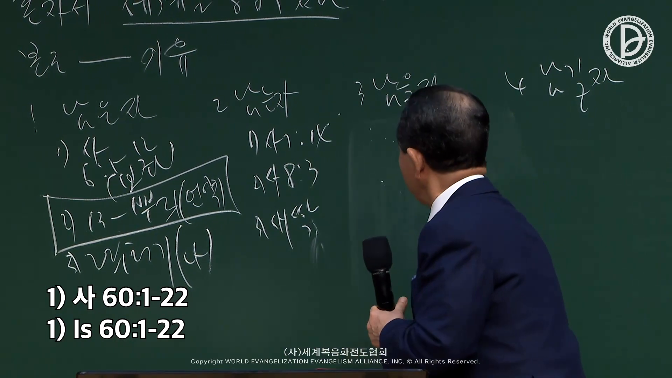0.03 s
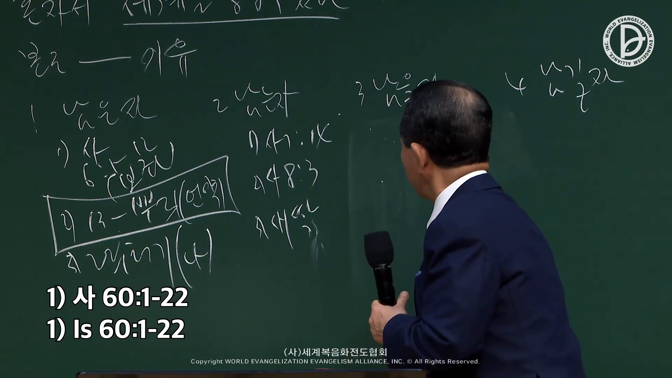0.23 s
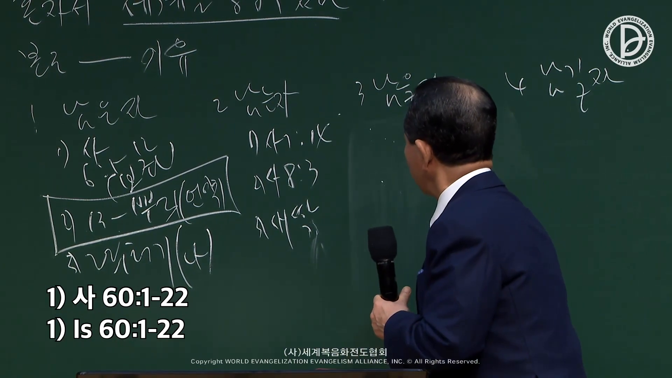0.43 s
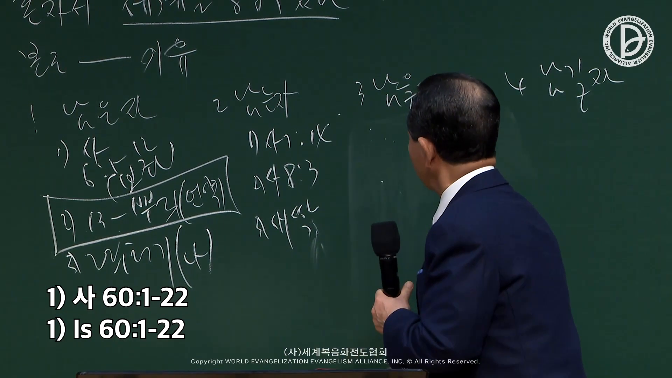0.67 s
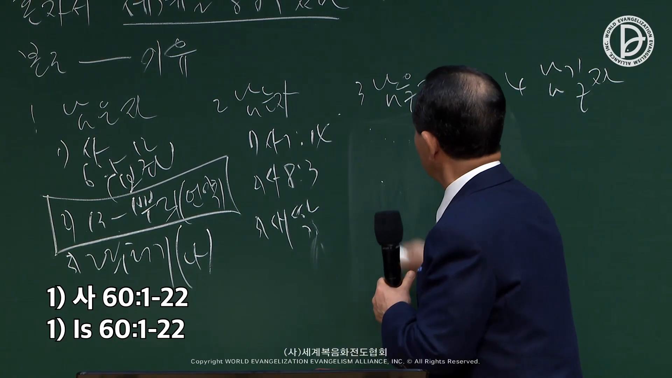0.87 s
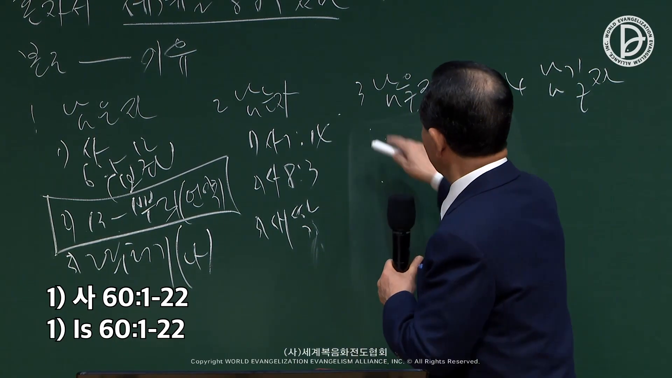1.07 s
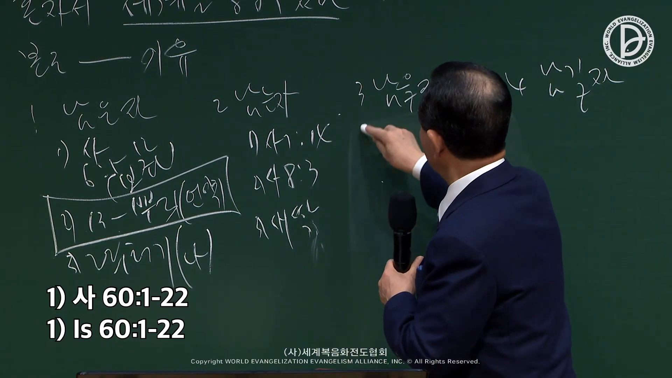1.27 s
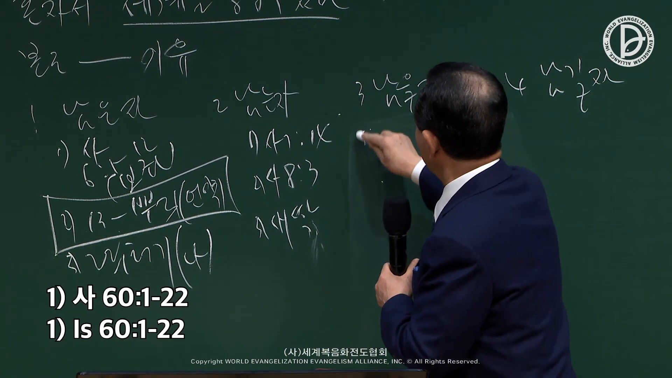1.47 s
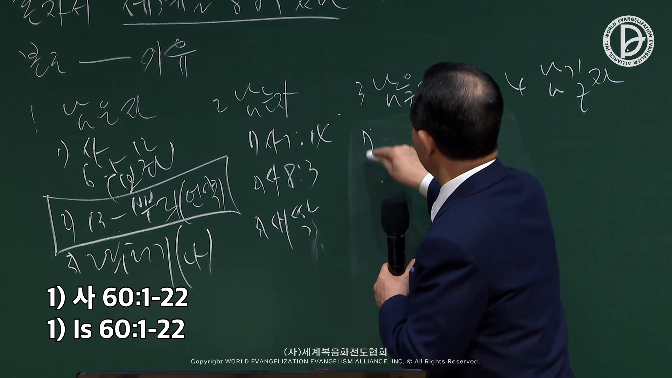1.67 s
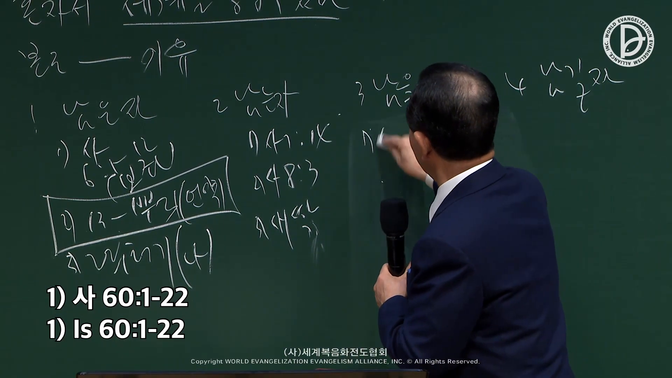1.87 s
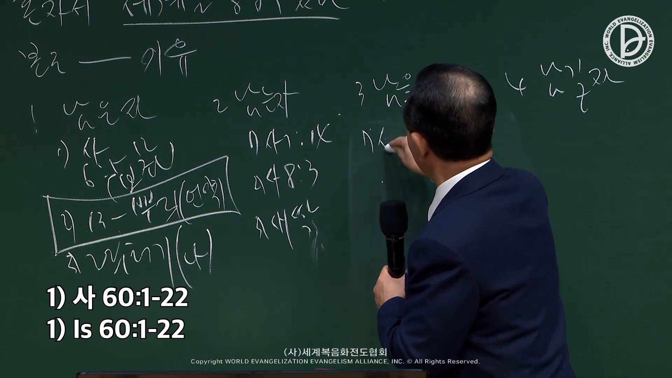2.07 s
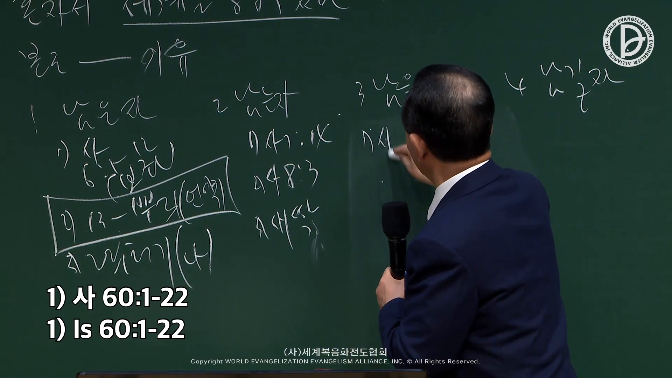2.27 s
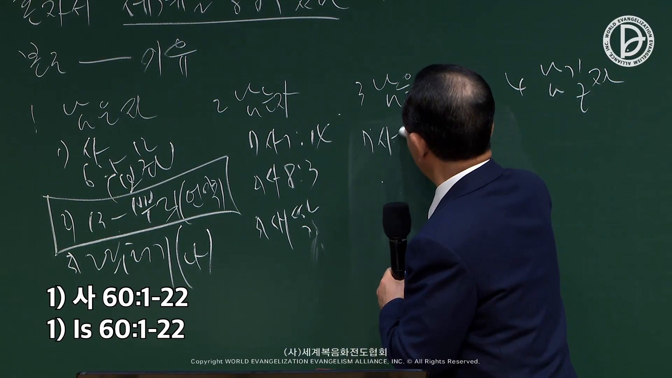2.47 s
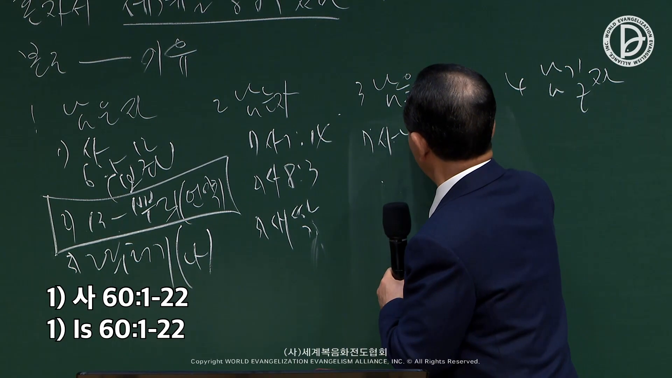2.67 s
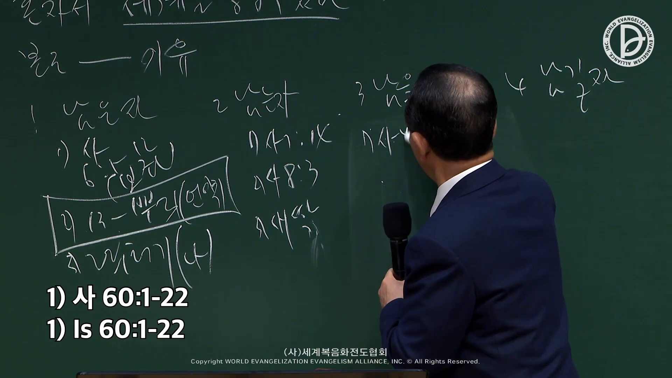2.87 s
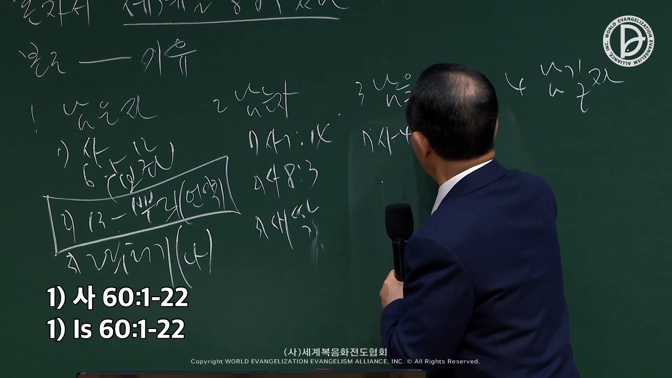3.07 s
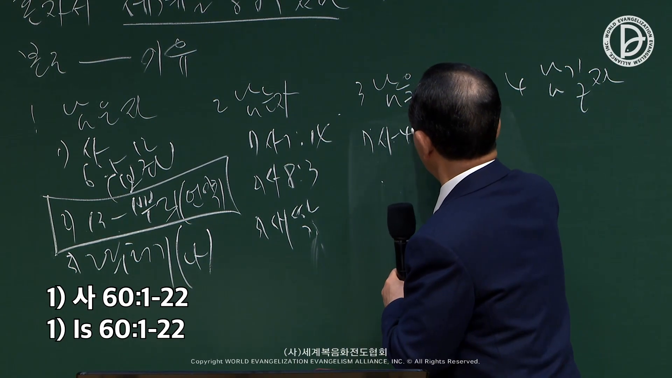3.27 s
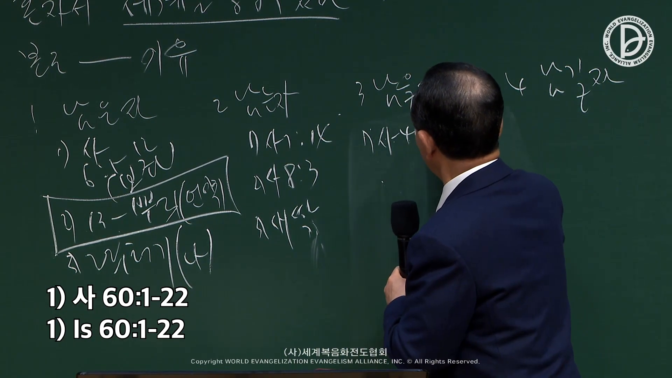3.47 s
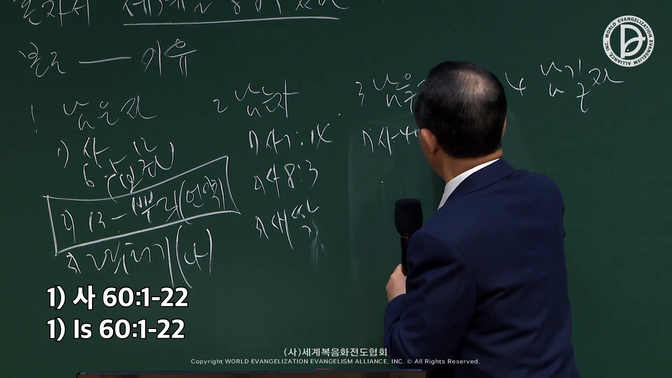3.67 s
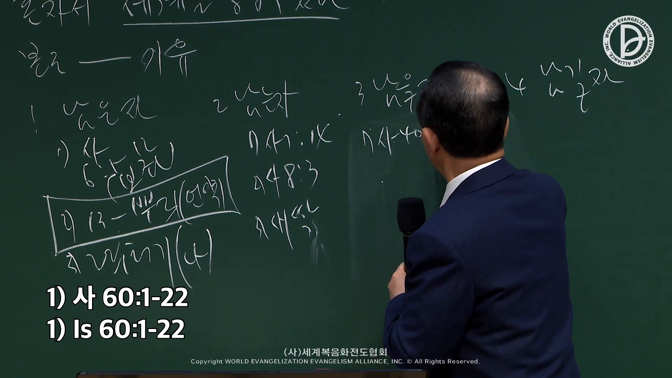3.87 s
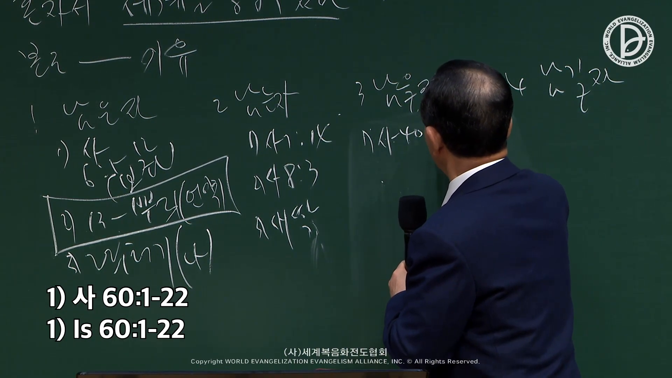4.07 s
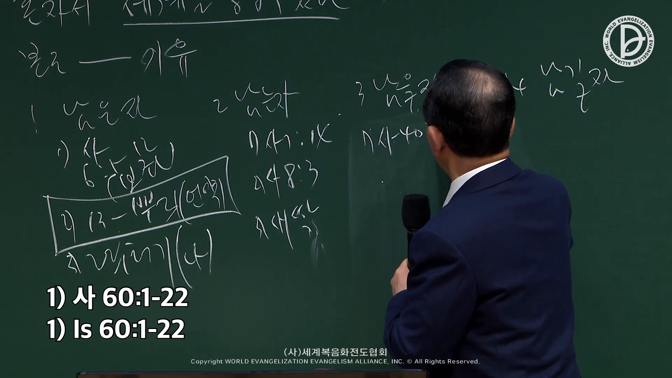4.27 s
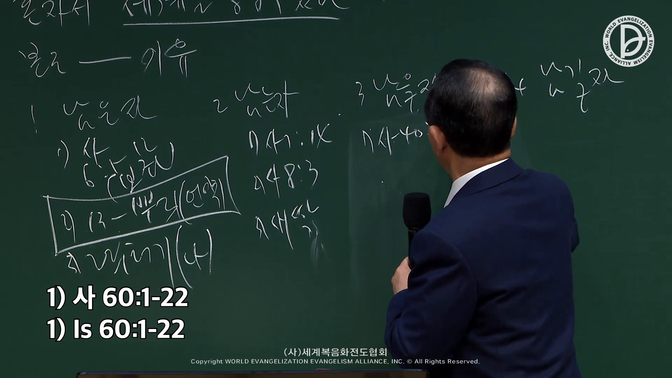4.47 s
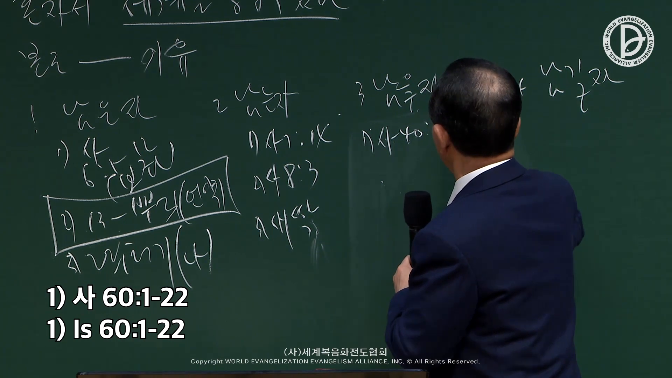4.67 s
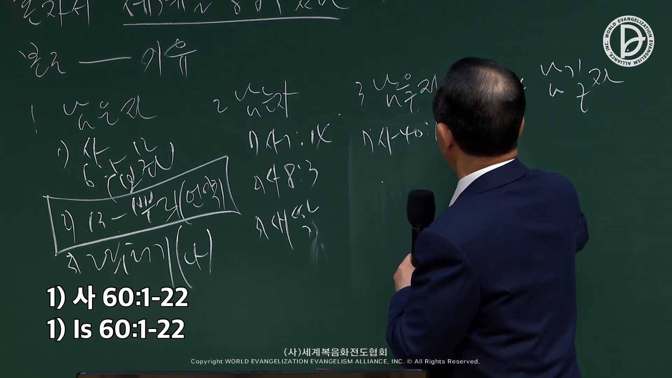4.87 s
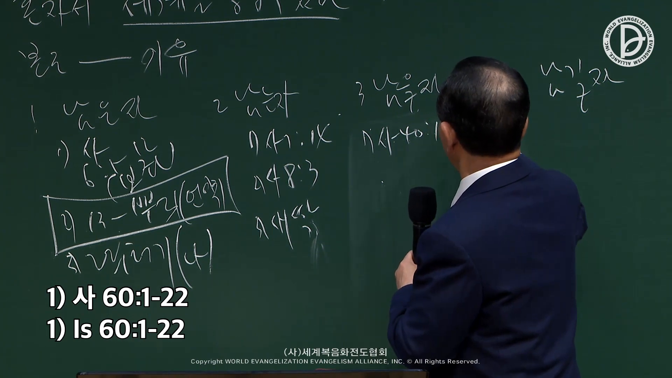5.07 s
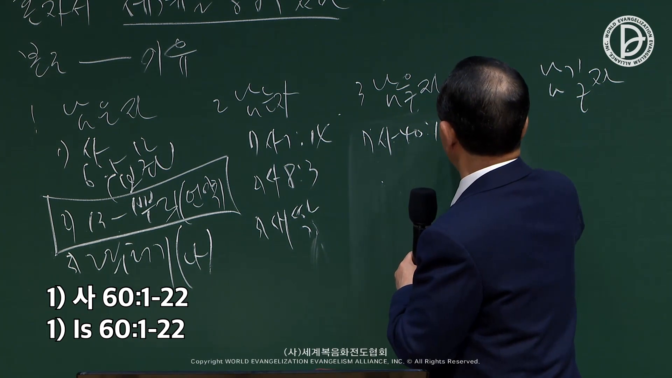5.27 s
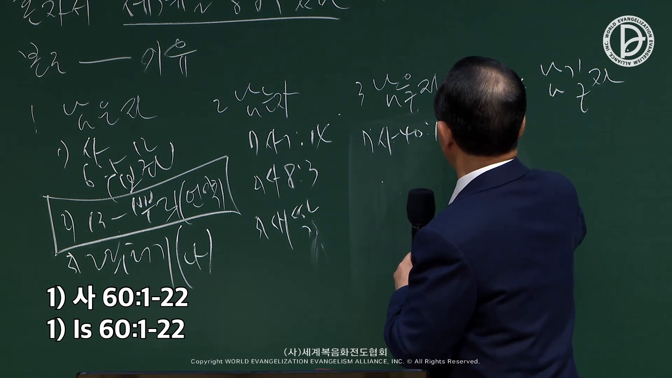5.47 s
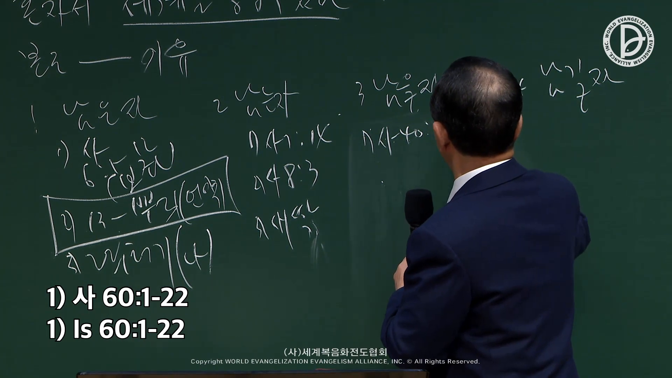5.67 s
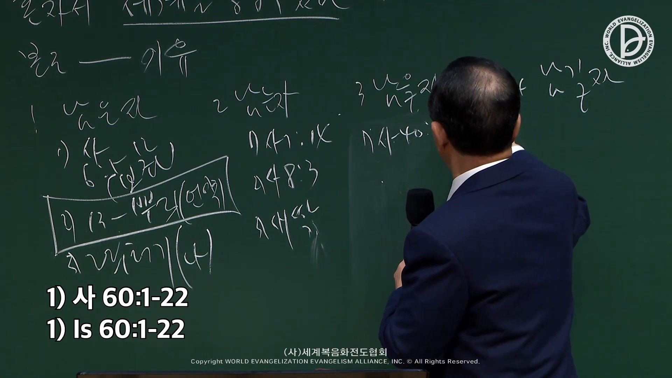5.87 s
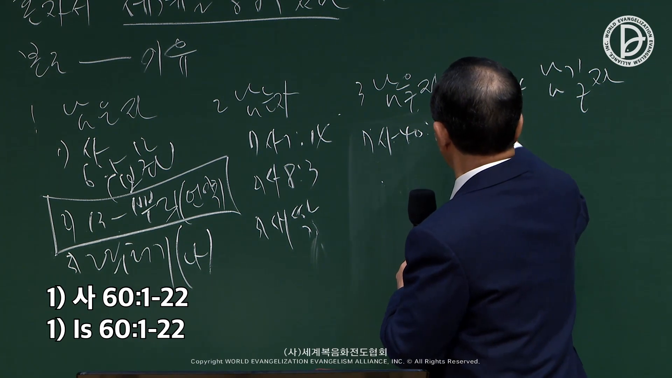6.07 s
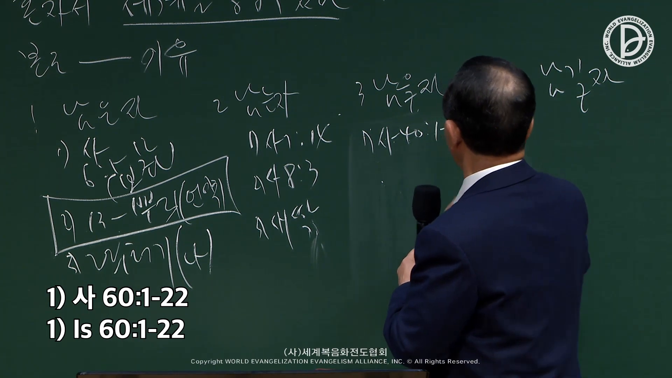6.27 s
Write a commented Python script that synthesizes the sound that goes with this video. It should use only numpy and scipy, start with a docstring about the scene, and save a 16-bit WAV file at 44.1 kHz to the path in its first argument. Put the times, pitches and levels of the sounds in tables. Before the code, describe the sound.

For the first second or so there is only a low, steady room hiss with a few faint bumps. At about 1.3 seconds chalk starts writing on a blackboard, close to the microphone. About a dozen strokes follow in a quick, uneven run until 3.7 seconds, most opening with a dry tap and continuing as a brief, gritty scrape. The board rings faintly after the taps, and the lecture room adds a soft reverberation. Near 4 seconds the chalk lightly grazes the board, then taps again at about 4.0, 4.4 and 4.6 seconds. Soft, dull rubs follow until around 5.4 seconds, with duller taps at 5.3 and 5.9 seconds. A few small, sharp ticks come between 6.1 and 6.3 seconds, over the same low hiss.

```python
"""Chalk writes a quick run of characters on a lecture-room blackboard, close to a hand-held microphone.
At first there is only a low hiss with a few faint bumps. From 1.3 s each stroke opens with a dry tap,
an impact that excites damped modes of board and chalk; friction then sounds as a brief, gritty scrape.
The panel rings on faintly and the room reverberates. Near 4 s the chalk grazes the board; soft rubs
and the last, duller taps follow until 5.9 s, and a few small ticks close the scene."""
import sys
import numpy as np
from scipy import signal
from scipy.fft import rfft, irfft
from scipy.io import wavfile

SR = 44100
rng = np.random.default_rng(int(sys.argv[2]) if len(sys.argv) > 2 else 0)


def file_out(sig):
    """Save sig as 16-bit WAV at sys.argv[1]."""
    # one column per channel
    cols = np.atleast_2d(sig).T
    # limit, then scale
    lim = np.clip(cols, -1, 1)
    pcm = np.round(lim * 32767).astype(np.int16)
    wavfile.write(sys.argv[1], SR, pcm)


N = 278800
TIME = np.arange(N) / SR

# Spectrum of room air and amplifier hiss. Each row: frequency in Hz, relative density in dB.
HISS_SPECTRUM = [(24, -51), (40, -7.5), (81, -28.5), (124, -1), (297, -4.5), (372, -1), (615, -8),
                 (790, -5.5), (1720, -8), (3830, -12.5), (5050, -13), (7540, -13), (16000, -13)]
# Steady tones of the electronics. Each row: frequency in Hz, rms level in dB.
WHINE_TONES = [(3839, -85), (7535, -85), (15682, -97)]
# Stray ticks and bumps. Each row: start in seconds, level in dB, band centre in Hz, t60 in seconds.
STRAY_TICKS = [(0.139, -69, 135, 0.24), (.21, -63.5, 560, 0.41), (.777, -71, 400, 0.057),
               (3.65, -55.5, 8500, 0.21), (4.775, -50.5, 178, 0.33), (6.093, -43.5, 7500, 0.013),
               (6.11, -41.5, 6700, 0.01), (6.244, -36.5, 6000, 0.0015)]
# Landings of the chalk. Each row: start in seconds, force in dB, click of the stick in dB, crunch of
# the tip in dB, pitch ratio of the stick as the grip changes, length of the slide in seconds (0: a dot).
LANDINGS = [(1.3096, -11, -5, -26, 1.04, .24), (1.5274, -13, 2.5, -9, 1.09, .24),
            (1.8449, -6.5, 2, 8, 1.033, 0.24), (2.0171, -11.5, 0, -1, 1.1, 0.22),
            (2.198, -11, 1.5, -4, 1.075, .22), (2.4093, -12.5, 1.5, -4, .99, 0.16),
            (2.5802, -13.5, 2, -2, 1.01, 0.17), (2.8426, -6.5, -1.5, -3, 1.053, 0.2),
            (3.0647, -8, 1, 1.5, 1.01, 0.22), (3.4106, -4.5, -9.5, 6.5, 1.073, 0.18),
            (3.527, -18, 6, -2, 1.05, 0), (3.6805, -10, -16, 7, 1.04, 0.027),
            (4.0231, -5.5, -16, 6.5, 1.1, 0.15), (4.354, -10.5, 2, 5.5, 1.027, .19),
            (4.6024, -5.5, -14, -7, 1.02, 0.23), (5.291, -16, -17, -7.5, 0.95, 0.15),
            (5.8603, -9.5, -24.5, -1, 1.01, 0.072)]
# Colour of a blow. Each row: frequency in Hz, plain level in dB, share of click, share of crunch.
CONTACT_COLOUR = [(437, 0, -0.0059, -0.022), (900, 0.18, 0.3, -0.098), (2338, 8, 0.87, -0.024),
                  (3340, -1.5, 0.35, 0.38), (4400, 0, 0.33, 0.28), (6000, 8.4, 0.66, 0.37),
                  (8500, -2, 0.34, 0.68), (11500, -14.5, -0.032, 0.67), (14500, -13.5, -.1, 0.66)]
# Heavily damped modes of board and stick. Each row: frequency in Hz, relative level in dB, t60 in seconds.
IMPACT_MODES = [(433, -5.5, 0.011), (797, -4.5, 0.011), (1178, -5.5, 0.0042), (1393, -8.5, 0.0048),
                (2184, -1.5, 0.0029), (2556, -0.5, 0.0026), (3286, -8, 0.0055), (4843, -5.5, 0.001),
                (5766, -7, 0.0017), (8600, -10, 0.0022), (10780, -4.5, 0.0028), (14200, -28.5, .0012)]
STICK_FROM_HZ, CRUMBLE_FROM_HZ = 1300, 4200
# Lingering modes of the whole panel. Each row: frequency in Hz, gain in dB, t60 in seconds.
PANEL_RESONANCES = [(440.6, -65, .6), (449.3, -60, 0.26), (430, -69, .1), (380, -70, 0.9),
                    (745, -65.5, 0.36)]
# Spectrum of a blow as it reaches the room. Each row: frequency in Hz, gain in dB.
RADIATED_SPECTRUM = [(60, -4.5), (130, 8), (250, 16.5), (430, 21.5), (800, 21.5), (1350, 17.5), (2300, 14),
                     (3400, 15.5), (4400, 6.5), (5800, -1.5), (8500, 1.5), (11500, 3), (13000, -1),
                     (16000, -8.5)]
# Spectra of a slide: gritty scrape, dull judder of the board, fizz of fine dust.
# Each row: frequency in Hz, relative density in dB.
SCRAPE_SPECTRUM = [(400, -19), (900, 1), (1350, -3), (1900, -0.5), (2700, -0.5), (3500, -6.5), (4500, -16),
                   (6000, -27), (8000, -26.5), (15000, -35)]
JUDDER_SPECTRUM = [(70, -34), (115, -20.5), (165, 9.5), (260, -9.5), (420, 14.5), (720, 2), (1050, 6),
                   (1500, -31), (4000, -35.5)]
DUST_SPECTRUM = [(3000, -18.5), (6000, 1), (9000, -3), (11500, -8), (13500, -1), (16000, -7.5)]
# Dull rubs between the last taps. Each row: start in seconds, length in seconds, level in dB.
DULL_RUBS = [(4.655, 0.31, -55.5), (5.124, 0.27, -63.5)]
# One close echo, then a cluster from about 32 ms after each tap, perhaps from the room's loudspeaker.
# Each row: delay in seconds, gain in dB.
EARLY_ECHOES = [(.0068, -24), (.0314, -17.3), (.036, -23), (.04, -21.5)]
# Diffuse sound of the room. Each row: frequency in Hz, near scatter in dB, echo cluster in dB,
# late tail in dB, t60 of the tail in seconds.
DIFFUSE_FIELD = [(99.3, -19, -13.5, -19.5, 0.91), (163, -14, -13.5, -10.5, 1), (400, -10.5, -34, -14.5, 1),
                 (826, -16.5, -21, -12.5, 1), (2360, -16, -14.5, -12.5, 0.83),
                 (6000, -12, -13.5, -8.5, 0.43), (11100, -6, -15, -8.5, 0.64),
                 (15200, -8, -14.5, -14, 0.41)]
# The chalk barely touches the board. One row: start in seconds, length in seconds, level in dB.
LIGHT_TOUCH = (3.83, 0.27, -61.5)
# Spectrum of that touch. Each row: frequency in Hz, relative density in dB.
GRAZE_SPECTRUM = [(1500, -24), (2800, -1), (3900, 2), (5200, -2.5), (7000, -6), (9000, -8), (12000, -19),
                  (16000, -24)]


def from_db(db):
    """Amplitude grows tenfold for every 20 dB."""
    return 10 ** (np.asarray(db) / 20)


def rms_one(x):
    """Normalisation to unit rms."""
    return x / np.sqrt(np.mean(x ** 2) + 1e-20)


def at_hz(points_hz, values, hz):
    """Interpolation along a logarithmic frequency axis."""
    return np.interp(np.log(np.maximum(hz, 1)), np.log(points_hz), values)


def coloured(x, spectrum):
    """Spectral shaping of a noise, returned at unit rms."""
    hz = np.arange(N // 2 + 1) * SR / N
    return rms_one(irfft(rfft(x) * from_db(at_hz(*np.transpose(spectrum), hz)), N))


def drift(per_s):
    """Slow random fluctuation of unit rms."""
    knots = rng.standard_normal(int(N / SR * per_s) + 2)
    return rms_one(np.interp(TIME * per_s, np.arange(len(knots)), knots))


def add(out, start, sound):
    """Superposition: a sound joins the mix at its start in seconds."""
    i = max(round(start * SR), 0)
    out[i:i + len(sound)] += sound[:N - i]


def background(hiss_db=-67.5):
    """Stationary noise of room air and amplifier, with a thin whine of wandering phase."""
    whine = sum(from_db(db) * np.sqrt(2) * np.sin(2 * np.pi * hz * TIME + .6 * drift(25))
                for hz, db in WHINE_TONES)
    return from_db(hiss_db) * coloured(rng.standard_normal(N), HISS_SPECTRUM) + whine


def ticks():
    """Transients: octave-wide bursts of noise decay exponentially."""
    out, t = np.zeros(N), TIME[:SR // 5]
    for start, db, hz, t60 in STRAY_TICKS:
        octave = signal.butter(2, [hz / np.sqrt(2), hz * np.sqrt(2)], "band", fs=SR, output="sos")
        noise = rms_one(signal.sosfilt(octave, rng.standard_normal(len(t))))
        add(out, start, noise * from_db(db - 60 * t / t60))
    return out


def blow_db(hz, force_db, click_db, crunch_db):
    """Excitation spectrum: force sets the level, click lifts the middle, crunch the treble."""
    contact_hz, plain_db, click_share, crunch_share = np.transpose(CONTACT_COLOUR)
    return force_db + at_hz(contact_hz, plain_db + click_share * click_db + crunch_share * crunch_db, hz)


def crush(crumb_share=0.91, decay_s=0.00053):
    """Contact force: an impulse, then noise as the tip crumbles for about a millisecond."""
    t = TIME[:SR // 250]
    crumbs = rng.standard_normal(len(t)) * t * np.exp(-t / decay_s)
    return np.sqrt(1 - crumb_share) * (t == 0) + np.sqrt(crumb_share) * crumbs / np.linalg.norm(crumbs)


def taps(low_cut_hz=256, thud_hz=42, thud_db=-21):
    """Impact excitation: each landing rings the damped modes of board and stick for milliseconds."""
    out, t = np.zeros(N), TIME[:SR // 25, None]
    hz, mode_db, t60 = np.transpose(IMPACT_MODES)
    signs, crisp = (-1) ** np.arange(len(hz)), hz > CRUMBLE_FROM_HZ
    for start, force_db, click_db, crunch_db, grip, _ in LANDINGS:
        pitch = np.where(hz > STICK_FROM_HZ, hz * grip, hz)
        amplitude = signs * from_db(mode_db + blow_db(hz, force_db, click_db, crunch_db))
        modes = -amplitude * np.sin(2 * np.pi * pitch * t) * np.exp(-np.log(1000) * t / t60)
        add(out, start, modes @ ~crisp)
        # only the fastest modes follow the single crumbs
        add(out, start, np.convolve(modes @ crisp, crush()))
    # a small patch of board radiates little bass, just a faint thud
    thud = from_db(thud_db) * signal.sosfilt(signal.butter(2, thud_hz, fs=SR, output="sos"), out)
    return signal.sosfilt(signal.butter(2, low_cut_hz, "high", fs=SR, output="sos"), out) + thud


def ring(x, hz, t60):
    """Damped resonator: a unit impulse starts a decaying sine of amplitude 1."""
    radius, angle = from_db(-60 / (t60 * SR)), 2 * np.pi * hz / SR
    return signal.lfilter([0, np.sin(angle)], [1, -2 * radius * np.cos(angle), radius ** 2], x + 1e-18)


def panel(blows):
    """Resonance: the lightly damped modes of the whole panel hum on after each blow."""
    return sum(from_db(db) * ring(blows, hz, t60) for hz, db, t60 in PANEL_RESONANCES)


def radiated_blows(size=512):
    """Radiation from the whole panel in all directions gives the room a smooth spectrum of each blow."""
    out = np.zeros(N)
    hz = np.arange(size // 2 + 1) * SR / size
    radiation_db = at_hz(*np.transpose(RADIATED_SPECTRUM), hz)
    for start, force_db, click_db, crunch_db, *_ in LANDINGS:
        gain = from_db(radiation_db + blow_db(hz, force_db, click_db, crunch_db))
        pulse = np.roll(irfft(gain, size), size // 2) * np.hanning(size)
        add(out, start - size / 2 / SR, pulse)
    return out


def pressure(start, length, bite_s=0.036, lift_share=0.49):
    """Normal force of a sliding contact: it bites, then eases off towards the end."""
    bite = (TIME - start) / bite_s
    lift = (start + length - TIME) / (lift_share * length)
    return np.clip(np.minimum(bite, lift), 0, 1)


def grains(per_s, spread_db=1.8, flutter_db=1.2):
    """Stick-slip friction: crumbling chalk makes tiny, uneven slips under a fluttering pressure."""
    slips = (rng.random(N) < per_s / SR) * rng.choice([-1, 1], N)
    size_db = spread_db * np.minimum(rng.exponential(1, N), 4)
    return slips * from_db(size_db + flutter_db * drift(90))


def strokes(scrape_db=-42, judder_db=-50, dust_db=-65, click_share=.55, delay_s=0.0049):
    """Sliding friction: the chalk slides as hard as it landed; dull rubs only make the board judder."""
    push, scrape = np.zeros(N), np.zeros(N)
    for start, force_db, click_db, _, _, slide_s in LANDINGS:
        if slide_s > 0:
            slide = from_db(force_db) * pressure(start + delay_s, slide_s)
            push += slide
            # a tip that lands with a click also scrapes harder
            scrape += from_db(scrape_db + click_share * click_db) * slide
    rubs = sum(from_db(db) * pressure(start, length) for start, length, db in DULL_RUBS)
    judder = from_db(judder_db) * push + rubs
    grit = coloured(grains(per_s=3800), SCRAPE_SPECTRUM)
    rumble = coloured(grains(per_s=1800), JUDDER_SPECTRUM)
    dust = coloured(grains(per_s=2500), DUST_SPECTRUM)
    return scrape * grit + judder * rumble + from_db(dust_db) * push * dust


def echoes(x, low_cut_hz=560):
    """Multipath propagation: distinct, delayed copies of the sound arrive with little bass."""
    out = np.zeros(N)
    thin = signal.sosfilt(signal.butter(1, low_cut_hz, "high", fs=SR, output="sos"), x)
    for delay, db in EARLY_ECHOES:
        add(out, delay, from_db(db) * thin)
    return out


def room(x, near_t60=0.18, cluster_t60=0.057, cluster_s=.032, build_s=.02):
    """Reverberation: near scatter, an echo cluster after 32 ms, a tail that dies sooner in the treble."""
    t, hz = TIME[:SR], np.arange(SR // 2 + 1)
    centres = np.geomspace(100, 16000, 14)
    bands = np.array([at_hz(centres, share, hz) for share in np.eye(len(centres))])
    room_hz, *columns = np.transpose(DIFFUSE_FIELD)
    near_db, cluster_db, late_db, late_t60 = (at_hz(room_hz, c, centres)[:, None] for c in columns)

    def echo_power(db, start, t60):
        """Exponential decay of the power in a cloud of echoes."""
        rate = np.log(10 ** 6) / t60
        return from_db(db) ** 2 * (t > start) * rate * np.exp(-rate * np.maximum(t - start, 0))

    near = echo_power(near_db, 0.0035, near_t60)
    cluster = echo_power(cluster_db, cluster_s, cluster_t60)
    tail = echo_power(late_db, cluster_s, late_t60) * np.clip((t - cluster_s) / build_s, 0, 1)
    envelope = np.sqrt(near + cluster + tail)
    # chalk and writer move, so each landing meets a new pattern of diffuse echoes
    cuts = [0] + [round((start - .01) * SR) for start, *_ in LANDINGS] + [N]
    out = np.zeros(N)
    for first, last in zip(cuts, cuts[1:]):
        band_noise = irfft(bands * rfft(rng.standard_normal(SR)), SR)
        response = np.sum(envelope * band_noise, axis=0) / np.sqrt(SR)
        add(out, first / SR, signal.fftconvolve(x[first:last], response))
    return out


def graze():
    """Friction under a very light load: only the finest grit sounds."""
    start, length, db = LIGHT_TOUCH
    touch = from_db(db) * pressure(start, length, bite_s=0.06, lift_share=.4)
    return touch * coloured(grains(per_s=6000), GRAZE_SPECTRUM)


def scene():
    """Superposition of direct sound, early echoes, reverberation and background."""
    blows = taps()
    soft_sounds = panel(blows) + strokes() + graze() + ticks()
    direct = blows + soft_sounds
    return (direct + echoes(direct) + room(radiated_blows() + soft_sounds) + background())[None]


def record(dry, cutoff_hz=16300, offset=-.0021):
    """Band limiting: a steep low-pass cuts the top, and the converter sits slightly off zero."""
    return signal.sosfilt(signal.ellip(10, .1, 70, cutoff_hz, fs=SR, output="sos"), dry) + offset


dry = scene()
out = record(dry)
file_out(out)
```